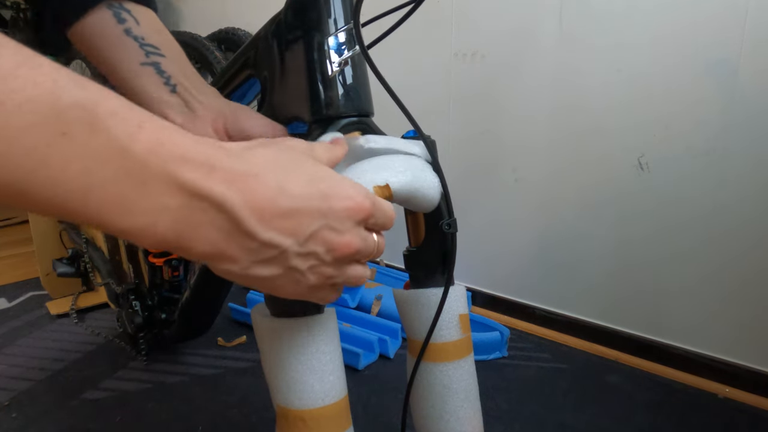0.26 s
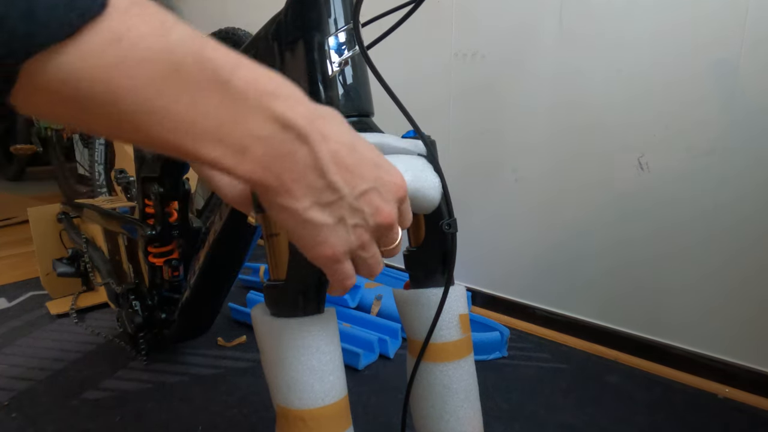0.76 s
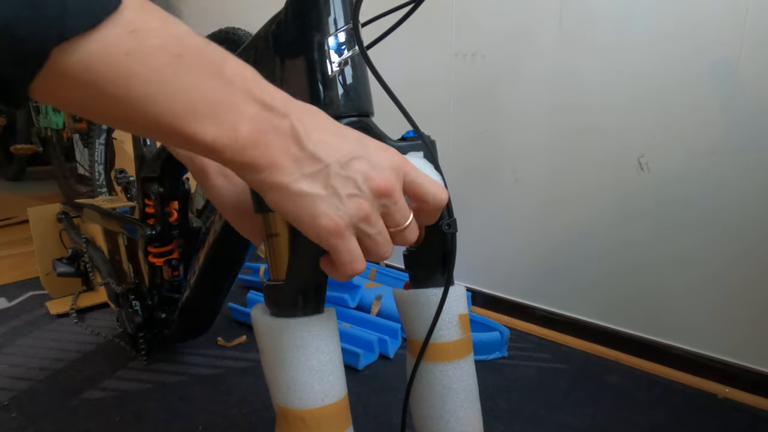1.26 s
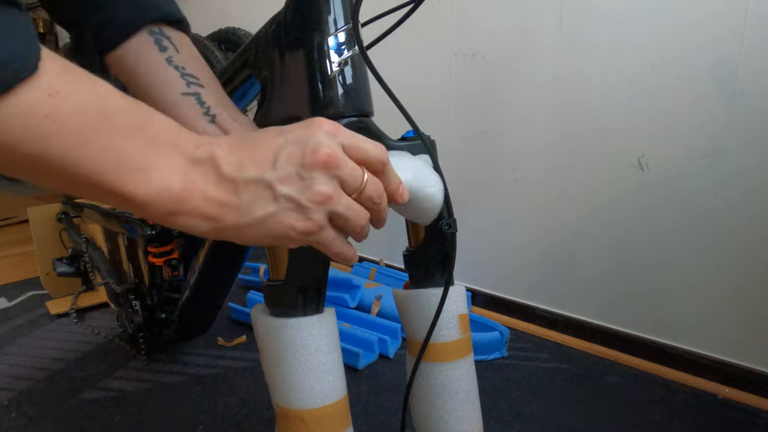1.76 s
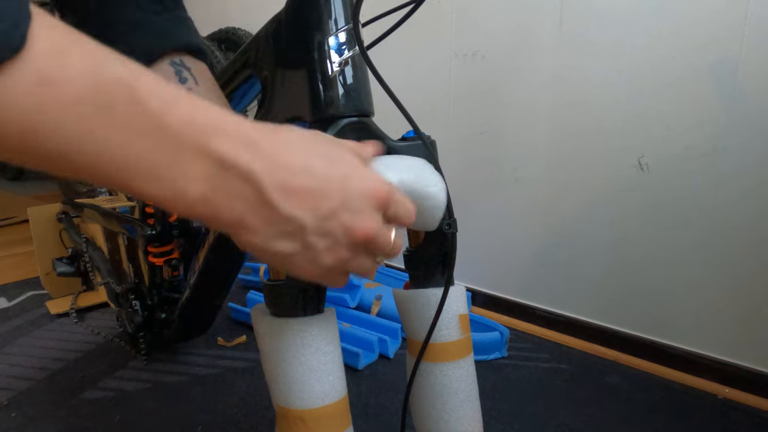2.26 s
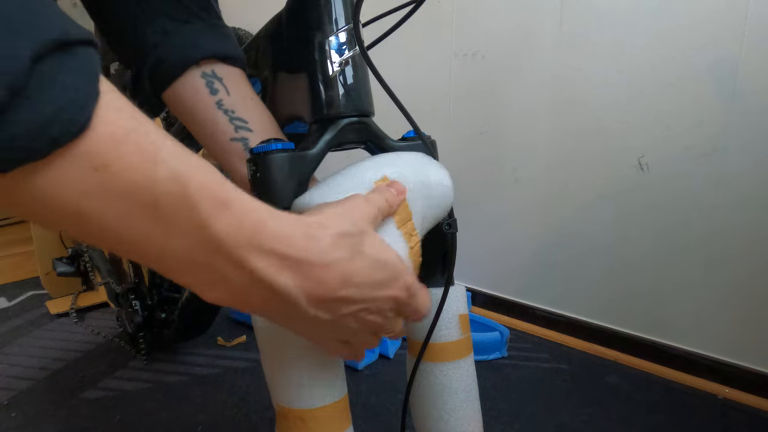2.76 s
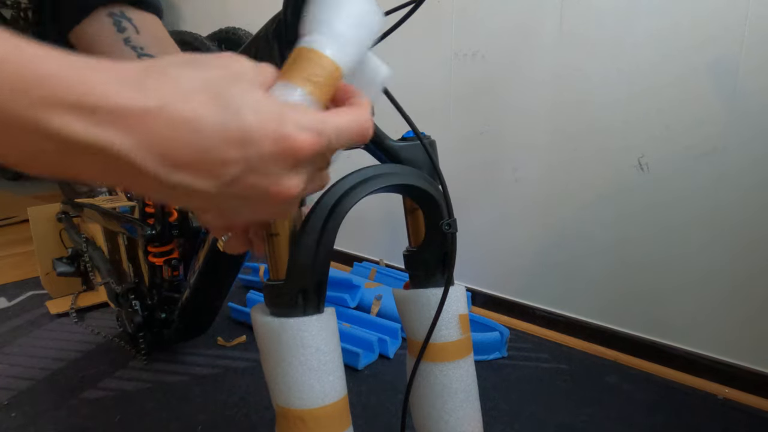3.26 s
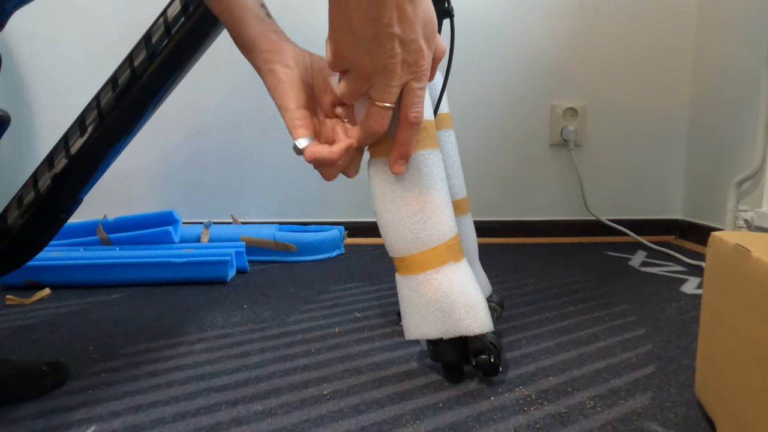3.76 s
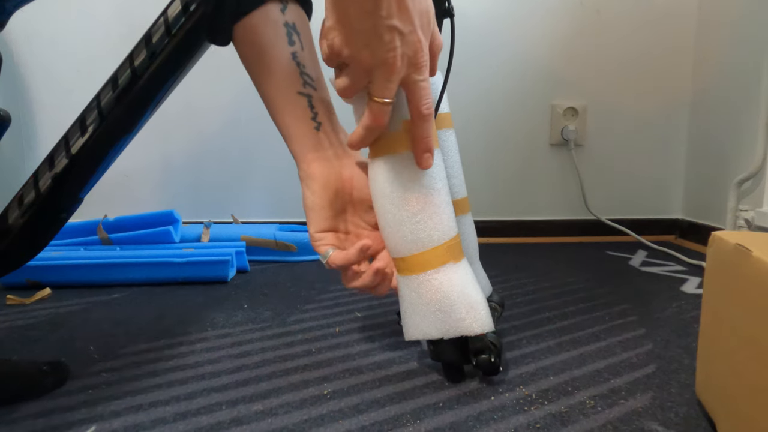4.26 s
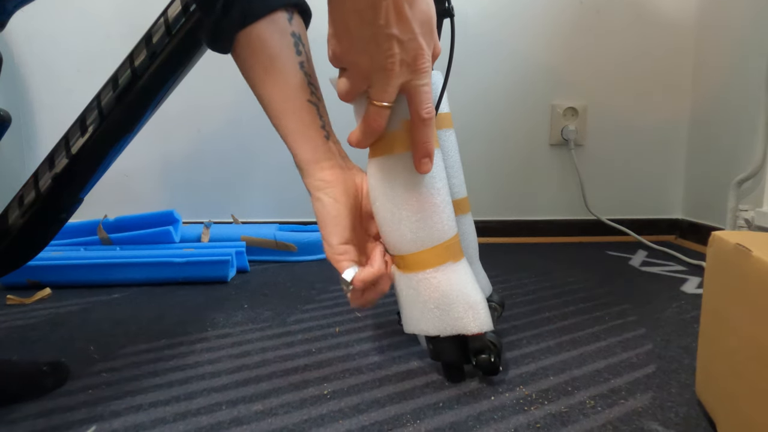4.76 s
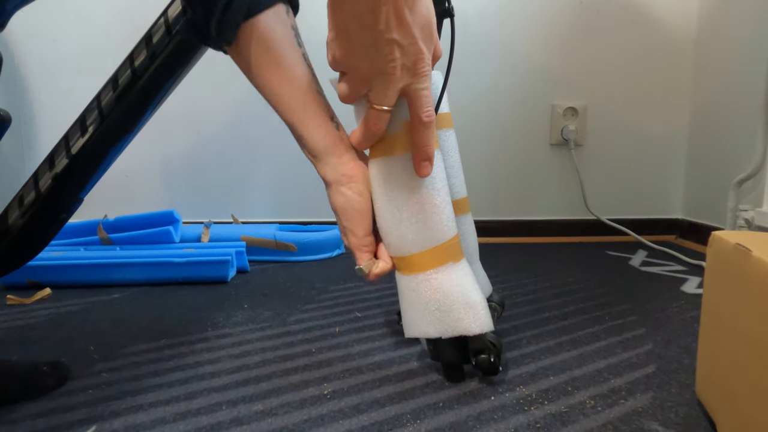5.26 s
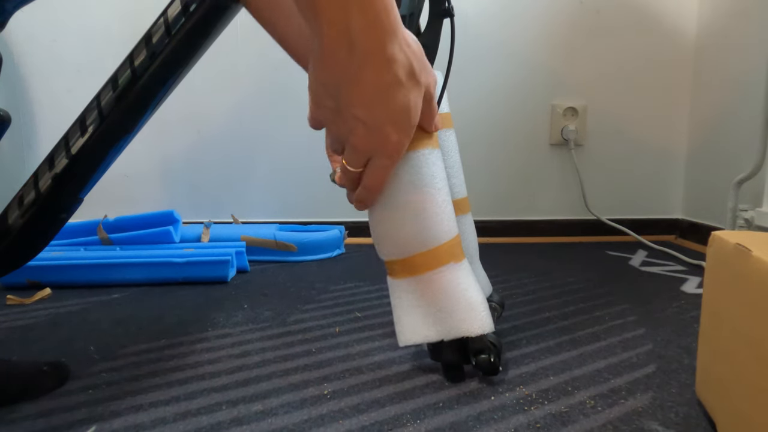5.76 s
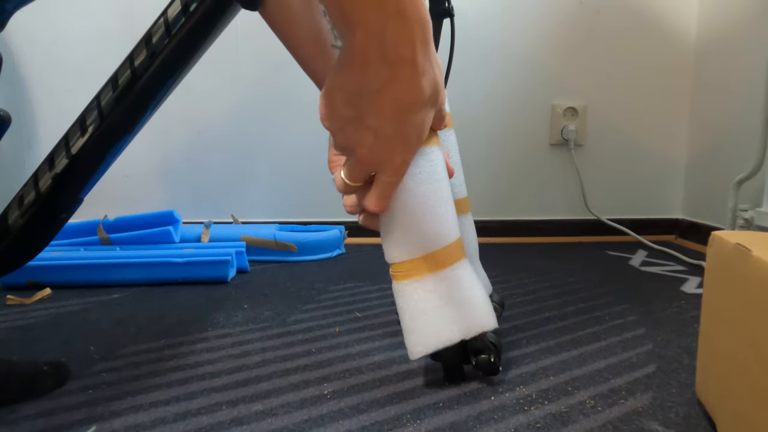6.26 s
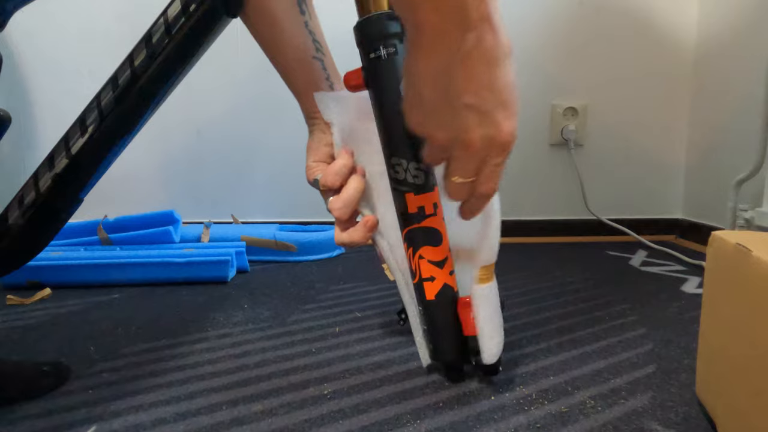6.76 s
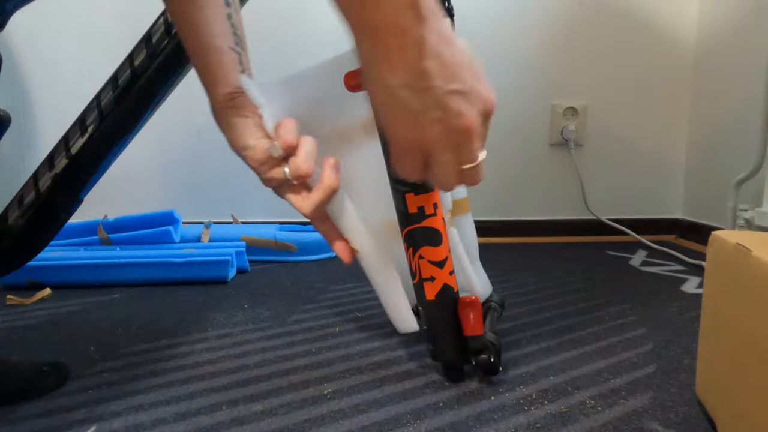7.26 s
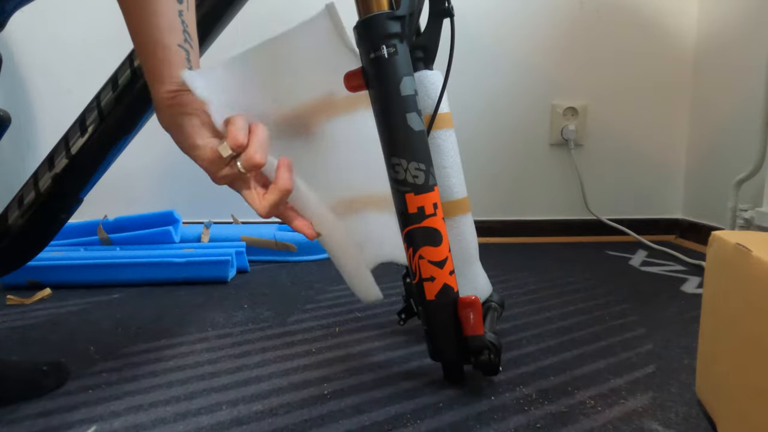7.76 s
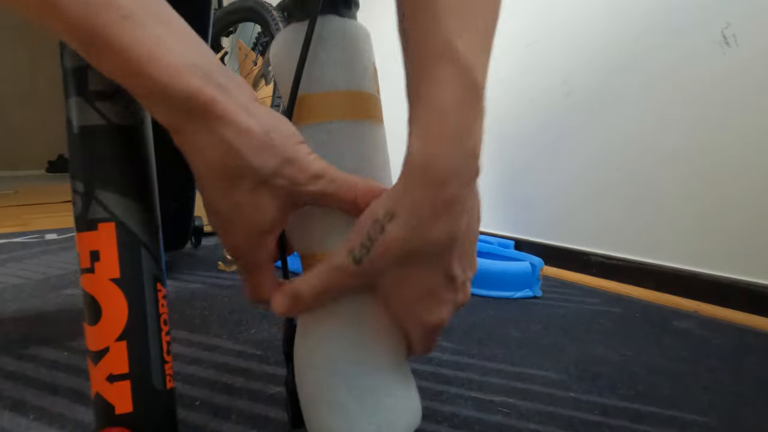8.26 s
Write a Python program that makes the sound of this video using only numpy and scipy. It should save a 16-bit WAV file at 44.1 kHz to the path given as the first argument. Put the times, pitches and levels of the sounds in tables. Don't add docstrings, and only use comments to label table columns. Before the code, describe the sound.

Hands strip foam sleeves off a bike fork: grainy rubs, creaks, sharp tape cracks, a rapid tearing crackle, then hard closing pops.

```python
import sys
import numpy as np
from scipy import signal
from scipy.fft import rfft, irfft
from scipy.io import wavfile

SR = 44100
rng = np.random.default_rng(int(sys.argv[2]) if len(sys.argv) > 2 else 0)


def decibels_to_gain(level_db):
    exponent = np.asarray(level_db, float) / 20
    return 10 ** exponent


def to_wav(s):
    ch = np.atleast_2d(s).T
    pcm = np.round(np.clip(ch, -1, 1) * 32767)
    wavfile.write(sys.argv[1], SR, pcm.astype(np.int16))


N = 374850

# (frequency [Hz], width [Hz], level [dB])
FOAM_WALL = [(1040, 166, -5), (1530, 330, -4.5), (1853, 310, -5.5), (2464, 110, -11.5)]
# (time [s], peak [dB], ring [Hz], crack [dB], thud [dB])
TAPE_BREAKS = [
    (3.7546, -5, 1920, -9, -31.5),
    (5.2234, -4, 1640, -10.5, -19.5),
    (6.487, -6, 1640, -22, -18),
]
# (time [s], peak [dB], ring [Hz], crack [dB], crack [Hz])
SEAM_RIPS = [(5.895, -29.5, 990, -54, 4200), (5.912, -29, 1040, -54, 7820), (5.932, -22.5, 990, -38, 4270),
             (5.95, -23, 980, -37, 4200), (5.955, -30, 1810, -37, 4590), (5.964, -22, 1670, -38, 4660),
             (5.977, -19.5, 1040, -31, 4200), (5.991, -26, 1520, -31.5, 4670),
             (6.009, -16, 1510, -21.5, 5700), (6.022, -23, 1460, -30, 4740), (6.04, -21.5, 1020, -21, 5850),
             (6.061, -21, 1070, -27.5, 5100), (6.085, -24, 1010, -29, 5800), (6.108, -20, 1500, -19, 5700),
             (6.125, -20.5, 1040, -32, 5140), (6.139, -24, 1460, -22, 4760), (6.158, -18.5, 990, -25, 4620),
             (6.187, -18.5, 1550, -20, 6500), (6.22, -15.5, 960, -25.5, 4600),
             (6.226, -17.5, 1880, -25.5, 6700), (6.271, -22, 1420, -20, 6660),
             (6.296, -14, 1020, -24, 5070), (6.301, -18.5, 1430, -21.5, 6660),
             (6.338, -18.5, 1400, -20, 6940), (6.367, -18.5, 1080, -21.5, 5040),
             (6.371, -14.5, 1410, -26.5, 6500), (6.428, -18.5, 1040, -27.5, 5080),
             (6.435, -20, 1350, -24, 4680)]


def rms_one(x):
    return x / np.sqrt(np.mean(x ** 2) + 1e-20)


def in_time(rows):
    s, *columns = np.transpose(rows)
    return [np.interp(np.arange(N) / SR, s, c) for c in columns]


def at_hz(points, size):
    hz = np.maximum(np.fft.rfftfreq(size, 1 / SR), 1)
    return np.interp(np.log(hz), np.log(np.array(points)[:, 0]), np.array(points)[:, 1])


def colour(x, points):
    return irfft(rfft(x) * decibels_to_gain(at_hz(points, len(x))), len(x))


def drift(rate_hz):
    r = np.exp(-40 * np.pi * rate_hz / SR)
    noise = rng.standard_normal(N // 20 + 4002)
    slow = signal.lfilter([1], [1, -2 * r, r * r], noise)[4000:]
    return np.interp(np.arange(N) / 20, np.arange(len(slow)), 2 * np.tanh(rms_one(slow) / 2))


def resonate(x, hz, width_hz):
    r = np.exp(-np.pi * abs(width_hz) / SR)
    zeros = np.array([1, 0, -1]) * (1 - r * r) / 2
    return signal.lfilter(zeros, [1, -2 * r * np.cos(2 * np.pi * hz / SR), r * r], x + 1e-18)


def body(x, modes, spread_db):
    return sum((-1) ** k * decibels_to_gain(db + spread_db[k]) * resonate(x, hz, width_hz)
               for k, (hz, width_hz, db) in enumerate(modes))


def grains(per_s, size_db, clump_db, clump_hz):
    sizes = decibels_to_gain(size_db * np.minimum(rng.exponential(1, N), 5)) * rng.choice([-1, 1], N)
    return sizes * (rng.random(N) < per_s / SR) * decibels_to_gain(clump_db * drift(clump_hz))


def add(out, s, peak_db, shape):
    i = round(s * SR)
    out[i:i + len(shape)] += (decibels_to_gain(peak_db) * shape / np.abs(shape).max())[:N - i]


def background():
    # (frequency [Hz], level [dB per Hz])
    air_spectrum = [(12, -44), (20, -27), (48, -23.5), (100, -10), (135, 14.5), (168, 14.5), (825, -2.5),
                    (1150, 9), (2460, -8), (4180, -19.5), (5230, -72.5), (7110, 4), (12100, -22),
                    (16000, -15)]
    # (time [s], frequency [Hz], level [dB])
    hum_course = [
        (0.0, 63.9, -84.5),
        (1.76, 65.4, -64.5),
        (2.42, 65.5, -62.5),
    ]
    # (multiple [1], level [dB])
    hum_overtones = [(3.25, -13.5), (5.999, -14)]
    # (time [s], level [dB])
    rumble_course = [(0.0, -81), (2.01, -69), (2.39, -74), (2.79, -73), (3.67, -73.5), (3.84, -63),
                     (4.33, -82), (4.97, -81), (5.3, -70), (5.78, -85), (5.99, -82), (6.46, -70.5),
                     (6.63, -77), (7.62, -84), (8.29, -71), (8.5, -80)]
    duck_db, duck_s = -5.5, 0.87

    air = decibels_to_gain(-59 - 9.5) * rms_one(colour(rng.standard_normal(N), air_spectrum))
    since_s = np.arange(N) / SR - np.array(TAPE_BREAKS)[:, :1]
    ducks = np.where(since_s > 0, duck_db * np.exp(-np.abs(since_s) / duck_s), 0)
    air = decibels_to_gain(np.sum(ducks, axis=0)) * air

    low = signal.butter(3, [20, 52], "band", fs=SR, output="sos")
    rumble = rms_one(signal.sosfilt(low, rng.standard_normal(N)))
    rumble = decibels_to_gain(in_time(rumble_course)[0] + 3.5 + 2.6 * drift(3.6)) * rumble

    hz, hum_db = in_time([*hum_course, (2.6, 62, -100)])
    turns = np.cumsum(hz) / SR
    tones = sum(decibels_to_gain(db) * np.sin(2 * np.pi * k * turns) for k, db in [(1, 0.0061), *hum_overtones])
    hum = np.sqrt(2) * decibels_to_gain(hum_db + 1.2 * drift(4.4)) * tones
    return air + rumble + hum


def strokes():
    # (centre [s], half length [s], wall pressure [dB], skin
    # share [dB], hollow grip [dB])
    even_swells = [(0.3, 0.18, -63.5, 5, -15), (0.693, 0.19, -48, -7, -8),
                   (1.001, 0.15, -33.5, -10.5, -7.5), (1.173, 0.12, -55, -2.5, -10),
                   (1.493, 0.23, -51.5, -7.5, -11.5), (1.75, 0.29, -62.5, -2.5, -11),
                   (2.064, 0.064, -58, 1.5, -9.5), (2.77, 0.6, -55.5, 4.5, -6.5),
                   (2.998, 0.11, -47, 4, 0.5), (3.242, 0.068, -44.5, 0, -5),
                   (3.352, 0.041, -46.5, -4.5, -5),
                   (3.7, 0.2, -70.5, 16.5, -7), (4.214, 0.14, -56.5, 13.5, -9.5),
                  (4.5, 0.27, -67.5, 15.5, 1.5), (4.98, 0.29, -74, 17.5, 2), (5.17, 0.07, -71, 17, -8),
                  (5.639, 0.11, -51, 4, -14), (5.78, 0.034, -67, 4, -12), (5.89, 0.077, -52, -1, -3),
                  (5.99, .12, -43.5, -0.5, -7), (6.2, 0.4, -45, 3, 1), (6.381, 0.17, -39.5, 1, -2),
                  (7.04, 0.41, -63, 5.5, 2), (7.762, 0.18, -64.5, 0, -7), (8.2, 0.093, -45.5, 5, -6),
                  (8.45, 0.47, -42.5, 0, -9.5)]
    # (start [s], length [s], pressure [dB], skin share [dB], grip [dB])
    jerks = [(0.01, 0.3, -66, 9, -26), (0.605, 0.07, -38, -10, -9.5), (1.635, 0.05, -41.5, -7.5, -27),
             (2.144, 0.9, -40, -6, -18.5), (2.842, 0.14, -35, -6.5, -7), (3.137, 0.19, -40, -2.5, -5.5),
             (3.512, 0.35, -51.5, -3, -10.5), (3.747, 0.37, -46.5, -5, -4.5), (4.055, 0.33, -59, 1.5, -4.5),
             (4.768, 0.087, -54.5, -2, -4), (5.221, 0.47, -36.5, -22, -7), (5.403, 0.5, -48.5, 3, -8),
             (6.5, 0.29, -42.5, -17, 2.5), (6.753, 0.19, -54.5, 1.5, -6), (7.321, 0.21, -48.5, 0, 1.5),
             (7.922, .12, -62.5, 8.5, 1), (8.016, 0.13, -51, 3.5, 5.5), (8.115, 0.099, -46, 0, -0.5)]
    # (end [s], length [s], pressure [dB], skin share [dB], grip [dB])
    stops = [(6, 0.15, -48, -1, -18), (5.2, 0.3, -57.5, 10.5, -15), (7.635, 0.54, -58.5, 11.5, 0),
             (6.675, 0.79, -46.5, -8, -10)]
    layer_fades = (1.29, 0.99, 1.39)
    # (wall [dB], skin [dB], hollow [dB])
    resting_db = (-74, -84.5, -86)
    swell_edge_db, jerk_end_db = -19.5, -22.5
    jerk_attack_s, stop_s = 0.03, 0.031

    t = np.arange(0, N + 64, 64) / SR
    swells = even_swells
    fades = [swell_edge_db * ((t - s) / length_s) ** 2 for s, length_s, *_ in swells]
    fades += [jerk_end_db * np.maximum((t - s) / length_s, (s - t) / jerk_attack_s)
              for s, length_s, *_ in jerks]
    fades += [jerk_end_db * np.maximum((s - t) / length_s, (t - s) / stop_s)
              for s, length_s, *_ in stops]
    power = decibels_to_gain(2 * np.array(resting_db))[:, None]
    for fade_db, (_, _, db, skin_db, grip_db) in zip(fades, [*swells, *jerks, *stops]):
        layers_db = db + np.array([[0], [skin_db], [grip_db]])
        power = power + decibels_to_gain(2 * (layers_db + np.outer(layer_fades, fade_db)))
    return [np.interp(np.arange(N) / SR, t, np.sqrt(p)) for p in power]


def rubbing():
    # (frequency [Hz], width [Hz], level [dB])
    crown_wall = [(1106, 260, 1), (1175, 25, 12), (1500, 140, -1), (1823, 140, -2), (2140, 530, -11),
                  (3340, 510, -20), (4100, 67, -22), (5600, 490, -20)]
    crown_hollow = [(205, 48, -36), (275, 31, -11), (496, 40, 2.5), (647, 103, -3.5)]
    leg_hollow = [(147, 39, 6), (231.5, 210, 1), (388, 84, 4.5), (686, 1500, -2)]
    # (frequency [Hz], level [dB per Hz])
    hiss_spectrum = [(1180, -7.5), (2000, -3), (2490, -3), (2980, -4.5), (3520, -1), (3770, -1.5),
                     (4600, -2.5), (5250, -11), (5990, -4), (7060, -2.5), (9250, -17), (12400, -26),
                     (13800, -27.5), (16000, -54)]
    crown_off_s = 1.394

    on_wall, on_skin, on_hollow = strokes()
    loose = np.clip((np.arange(N) / SR - crown_off_s) * 10, 0, 1)
    stutter = decibels_to_gain(0.23 * drift(21))
    slips, slow_slips = grains(6000, 3.4, 2.3, 45), grains(2000, 2.0, 2.65, 21)

    walls = []
    for modes, top_hz in ((crown_wall, 6500), (FOAM_WALL, 3000)):
        band = signal.butter(2, [950, top_hz], "band", fs=SR, output="sos")
        rung = body(slips, modes, [2.9 * drift(7.6) for _ in modes])
        walls.append(rms_one(signal.sosfilt(band, rung)))
    steep = signal.butter(4, [130, 850], "band", fs=SR, output="sos")
    hollows = []
    for modes in (crown_hollow, leg_hollow):
        rung = body(slow_slips, modes, [1.5 * drift(5.7) for _ in modes])
        hollows.append(rms_one(signal.sosfilt(steep, rung)))

    fine = colour(grains(12000, 1.5, 1.68, 60), hiss_spectrum)
    hiss = -0.41 * resonate(fine, 4690, 820)
    for hz in 2400 * 1.372 ** np.arange(6):
        band = resonate(resonate(fine, hz, 0.99 * hz), hz, 0.99 * hz)
        hiss = hiss + decibels_to_gain(1.92 * drift(3.5) + 2.0 * drift(24)) * band
    hiss = rms_one(hiss)
    dull_hiss = signal.sosfilt(signal.butter(1, 7000, fs=SR, output="sos"), hiss)

    wall, hiss, hollow = [(1 - loose) * crown + loose * leg
                          for crown, leg in (walls, (dull_hiss, hiss), hollows)]
    return stutter * (on_wall * wall + on_skin * hiss + on_hollow * hollow)


def snaps(rows, burst_s, ring_q, wall_share, crack_s, thud_s, low_hz):
    # (frequency [Hz], width [Hz], level [dB])
    crack_modes = [(3300, 790, -4.5), (5070, 1010, -0.5), (5500, 2160, 1), (7180, 2750, -3.5),
                   (7870, 7100, -33), (12000, 14000, -22)]
    thud_modes = [(143.3, 98, 1), (280, 139, -0.5), (425, 247, 0), (610, 248, -3)]
    out, t = np.zeros(N), np.arange(3000) / SR
    thin = signal.butter(2, low_hz, "high", fs=SR, output="sos")
    small = signal.butter(6, 140, "high", fs=SR, output="sos")
    matt = signal.butter(3, 9000, fs=SR, output="sos")
    rattle = 0.36 * np.exp(-t / 0.0049)
    for s, peak_db, hz, crack_db, thud_db, *crack_hz in rows:
        noise, spread_db = rng.standard_normal((3, len(t))), rng.normal(0, 2.8, 12)
        burst = noise[0] * (np.exp(-(t / burst_s) ** 2) + rattle)
        ring = resonate(burst, hz, hz / ring_q) - 0.13 * resonate(burst, 1900, 2700)
        ring = ring + wall_share * body(burst, FOAM_WALL, spread_db[:len(FOAM_WALL)])
        add(out, s, peak_db, signal.sosfilt(thin, ring))

        crack = noise[1] * (np.exp(-t / crack_s) + rattle)
        crack = body(crack, crack_modes, spread_db[-len(crack_modes):])
        for top_hz in crack_hz:
            crack = crack + 1.9 * resonate(crack, top_hz, 0.14 * top_hz)
        add(out, s, crack_db - 0.5, signal.sosfilt(matt, crack))

        thud = body(noise[2] * np.exp(-t / thud_s), thud_modes, spread_db[4:8])
        add(out, s, thud_db, signal.sosfilt(small, thud))
    return out


def creaks():
    # (time [s], peak [dB], ring [Hz], crack [dB], thud [dB])
    creak_events = [(0.043, -41, 1200, -43.5, -68), (0.608, -31.5, 1140, -31, -52),
                    (0.625, -30, 1380, -36, -47), (0.696, -36.5, 1420, -39.5, -44),
                    (1.397, -37.5, 1550, -46, -55), (1.633, -32, 1340, -31, -72),
                    (1.905, -46, 1350, -57, -55), (2.123, -34, 1530, -58, -73),
                    (2.162, -35, 1250, -52, -70), (2.213, -30, 1450, -57, -64),
                    (2.304, -29, 2130, -28.5, -42.5), (2.421, -32.5, 2580, -35, -52),
                    (2.549, -57, 1470, -33, -54), (2.829, -26.5, 1190, -36, -31.5),
                    (2.993, -31, 1040, -53, -36), (3.125, -29, 1140, -54, -26.5),
                    (3.21, -34, 1690, -35, -63), (3.255, -26.5, 1060, -54, -28.5),
                    (3.348, -34.5, 1970, -27, -33.5), (3.509, -47, 1470, -33, -87),
                    (3.526, -28.5, 1550, -27.5, -51)]
    return snaps(creak_events, burst_s=0.0083, ring_q=4.9, wall_share=0.03,
                 crack_s=0.00067, thud_s=0.0054, low_hz=680)


def scuffs():
    # (start [s], end [s], note [Hz], level [dB])
    palm_drags = [(4.1, 4.19, 850, -51), (4.54, 4.66, 870, -56), (5.2, 4.7, 200, -55),
                  (0.646, 0.776, 270, -52.5), (0.65, 0.77, 515, -49), (6.912, 7.106, 970, -52),
                  (7.27, 7.37, 310, -46), (7.9, 8.12, 610, -52), (7.9, 7.95, 390, -50),
                  (7.98, 8.05, 414, -49), (6.88, 7.12, 247, -51.5), (6.73, 6.82, 192, -55),
                  (6.5, 6.69, 1760, -40.5), (5.24, 5.4, 1150, -38), (5.26, 5.44, 1800, -38),
                  (5.23, 5.33, 2500, -41), (5.48, 5.54, 2200, -44), (5.6, 5.68, 1350, -44),
                  (5.57, 5.71, 2400, -45), (.9, 1.08, 1160, -38), (5.88, 6.28, 177, -39.5),
                  (6.27, 6.46, 265, -36), (7.38, 7.43, 185, -53), (2.12, 2.26, 200, -55),
                  (2.13, 2.25, 620, -52), (7.57, 7.62, 950, -52), (3.79, 3.9, 1700, -48)]
    out, t, slips = 0, np.arange(N) / SR, grains(2500, 2.3, 2.0, 30)
    for start_s, end_s, hz, db in palm_drags:
        length_s = max(end_s - start_s, .02)
        stroke = np.sin(np.pi * np.clip((t - start_s) / length_s, 0, 1))
        note = stroke * resonate(resonate(slips, hz, 0.2 * hz), hz, 0.46 * hz)
        out = out + decibels_to_gain(db - 8.5) * np.sqrt(length_s * SR / N) * rms_one(note)
    return out


def picks():
    # (time [s], peak [dB], ring [Hz], crack [dB])
    nail_picks = [(1.32, -58, 1100, -66), (1.348, -54, 1210, -66), (1.517, -36, 1170, -57),
                  (1.552, -35, 1500, -54), (2.134, -35, 1600, -55), (3.72, -41, 1685, -37),
                  (4.006, -39, 2080, -35.5), (4.048, -41, 2700, -60), (4.115, -39, 1570, -51),
                  (4.221, -28.5, 3480, -45), (4.39, -43, 2760, -33), (4.575, -48, 1860, -35),
                  (4.615, -54, 3800, -35), (4.757, -50, 3490, -39), (4.769, -32.5, 3300, -30),
                  (4.946, -42.5, 3360, -36), (5.074, -54, 3500, -35), (5.174, -46, 3310, -36),
                  (5.391, -32, 1760, -44), (5.396, -34, 1800, -30), (5.411, -33, 1890, -30),
                  (5.43, -36, 1860, -28), (5.608, -28.5, 3300, -50), (5.629, -38.5, 1520, -51),
                  (5.848, -32.5, 1900, -29.5), (7.341, -38, 1334, -33), (7.593, -51.5, 3830, -34),
                  (7.878, -57.5, 2390, -44), (8.016, -36, 2040, -29.5), (8.111, -41, 1770, -28.5),
                  (8.24, -29, 1860, -25), (5.527, -37.5, 2270, -31.5), (5.786, -47, 1800, -45)]
    rows = [(*row, row[-1] - 21.5) for row in nail_picks]
    return snaps(rows, burst_s=0.00076, ring_q=11.0, wall_share=0.052,
                 crack_s=0.00071, thud_s=0.00085, low_hz=1020)


def knocks():
    # (time [s], peak [dB], tone [Hz])
    fingertips = [(1.323, -52, 600), (1.347, -50, 600), (1.515, -45, 644), (1.549, -47, 600),
                  (2.366, -43, 650), (2.488, -46, 850), (2.55, -50, 230), (2.745, -51, 434),
                  (3.012, -36, 1000), (3.222, -40, 700), (3.571, -42, 1480), (3.586, -39, 1470),
                  (4.388, -51.5, 386), (4.494, -53, 665), (4.514, -49, 659), (4.589, -49, 969),
                  (4.622, -40, 685), (4.768, -47, 910), (4.88, -49, 1800), (4.904, -52, 1900),
                  (5.397, -37.5, 500), (5.409, -32.5, 450), (5.421, -39, 474), (5.431, -37, 600),
                  (7.339, -39, 610), (7.599, -50, 200), (8.024, -36, 403)]
    decay_cycles, upper, upper_db = 1.62, 1.54, -4.5
    out, t = np.zeros(N), np.arange(2000) / SR
    for s, peak_db, hz in fingertips:
        tones = np.sin(2 * np.pi * hz * t) + decibels_to_gain(upper_db) * np.sin(2 * np.pi * upper * hz * t)
        add(out, s, peak_db, tones * t * np.exp(-t * hz / decay_cycles * 2))
    return out


def slaps(rows, tones, length_s):
    out, t = np.zeros(N), np.arange(400) / SR
    swing = np.sin(np.pi * np.minimum(t / length_s, 1) ** .6) ** 2
    for s, peak_db, hz, *_ in rows:
        flap = sum(decibels_to_gain(db) * np.sin(2 * np.pi * (k * hz * t + rng.random())) for k, db in tones)
        add(out, s, peak_db, swing * flap)
    return out


def pops():
    # (time [s], peak [dB], ring [Hz], crack [dB])
    thumb_pops = [
        (2.123, -24, 1500, -51),
        (2.8257, -26, 1280, -23),
        (3.1232, -26, 1180, -47),
        (8.175, -15.5, 1490, -27),
        (8.3223, -7, 1537, -15.5),
        (8.4115, -7, 1560, -21),
        (8.4434, -6, 1520, -21),
    ]
    # (multiple [1], level [dB])
    pop_tones = [(1.0001, 0.5), (1.35, -5.5), (1.95, -10)]
    after = [(s, db - 5.0, hz, crack_db, db - 24.0, 7000) for s, db, hz, crack_db in thumb_pops]
    ragged = snaps(after, burst_s=0.0034, ring_q=8.3, wall_share=0.31,
                   crack_s=0.0017, thud_s=0.0013, low_hz=750)
    return slaps(thumb_pops, pop_tones, 0.0031) + ragged


def tugs():
    # (time [s], peak [dB], share of the full ring left by the holding hand [1])
    tug_events = [(2.824, -40.5, 0.34), (2.987, -54, 0.33), (3.123, -47, .3), (3.255, -28.5, 0.36),
                  (3.346, -55, 0.35), (3.757, -21.5, 0.94), (5.224, -20.5, 1.12), (6.303, -50, .3),
                  (6.367, -49, .3), (6.487, -23, 0.43), (7.343, -54, .4), (7.598, -56, 0.34),
                  (7.752, -52, 0.46), (8.018, -53.5, 0.5), (8.298, -42, 0.44), (8.367, -51, .4)]
    # (frequency [Hz], level [dB], t60 [s])
    fork_modes = [(37.8, -1, 0.37), (64.4, 4, 0.14), (77, -3.5, 0.2), (113, -11, 0.2), (150, -5.5, 0.18),
                  (173, -2, 0.14), (216, -2, 0.14)]
    out, t = np.zeros(N), np.arange(SR // 2) / SR
    for s, peak_db, share in tug_events:
        boom = 0
        for hz, db, t60_s in fork_modes:
            beat = 0.46 * np.sin(2 * np.pi * (rng.uniform(2.0, 22) * t + rng.random()))
            fall_db = db + rng.normal(0, 4.2) - 60 * t / (abs(share * t60_s) + .01)
            onset = 1 - np.exp(-t * hz / 0.41)
            boom = boom + (1 + beat) * decibels_to_gain(fall_db) * onset * np.sin(2 * np.pi * hz * t)
        add(out, s, peak_db, boom * (1 - np.exp(-t / 0.0013)))
    return out


def recoils():
    # (time [s], peak [dB], first pitch [Hz], last pitch [Hz], length [s])
    whips = [
        (2.8282, -10, 1600, 1250, .0012),
        (2.8302, -19, 1200, 1150, .003),
        (3.1232, -15, 1500, 1300, .0009),
        (3.1251, -15, 1300, 1100, .0009),
        (3.1267, -20, 1700, 1500, .0012),
        (3.7544, 2, 1400, 2900, .0013),
        (5.2234, 2, 2700, 1150, .0018),
        (6.4865, 0, 1900, 1550, .0017),
    ]
    # (multiple [1], level [dB])
    whip_tones = [(1.001, 0), (1.65, -6), (3.2, -15)]
    sag_s, attack_s = .0012, .0004
    out, t = np.zeros(N), np.arange(600) / SR
    for s, peak_db, first_hz, last_hz, length_s in whips:
        turns = np.cumsum(last_hz + (first_hz - last_hz) * np.exp(-t / sag_s)) / SR
        whip = sum(decibels_to_gain(db) * np.sin(2 * np.pi * k * turns) for k, db in whip_tones)
        attack = 1 - np.exp(-(t / attack_s) ** 2)
        add(out, s, peak_db, whip * attack * np.exp(-(t / length_s) ** 2))
    return out


def breaks():
    # (time from break [s], level [dB])
    lead_in = [
        (-.0107, -21),
        (-.0212, -35),
    ]
    # (multiple [1], level [dB])
    slap_tones = [(1.0001, 3.5), (1.5, 1), (2.05, -1.5), (4.099, -12)]
    rows = [(s, db - 7, hz, crack_db, thud_db) for s, db, hz, crack_db, thud_db in TAPE_BREAKS]
    for s, db, hz, crack_db, thud_db in TAPE_BREAKS:
        for lead_s, lead_db in lead_in:
            rows.append((s + lead_s, db + lead_db + 10.5, hz,
                         crack_db + lead_db - 4.5, thud_db + lead_db + 0.5))
    ragged = snaps(rows, burst_s=0.0011, ring_q=1.5, wall_share=0.34,
                   crack_s=0.001, thud_s=0.0032, low_hz=1000)
    dull = signal.butter(4, 8000, fs=SR, output="sos")
    return signal.sosfilt(dull, ragged) + decibels_to_gain(-9) * slaps(TAPE_BREAKS, slap_tones, 0.0017)


def rips():
    crack_db, thud_db = 8.5, -10
    rows = [(s, db, hz, mean_db + crack_db, db + thud_db, crack_hz)
            for s, db, hz, mean_db, crack_hz in SEAM_RIPS]
    return snaps(rows, burst_s=0.00055, ring_q=2.1, wall_share=0.1,
                 crack_s=0.0011, thud_s=0.001, low_hz=430)


def between_rips():
    sag_db_per_s, floor_db = -330, -10
    t, rip_s = np.arange(N) / SR, np.array(SEAM_RIPS)[:, 0]
    since_s = t - rip_s[np.maximum(np.searchsorted(rip_s, t) - 1, 0)]
    ripping = (since_s > 0) & (t < TAPE_BREAKS[-1][0])
    return decibels_to_gain(np.where(ripping, np.maximum(sag_db_per_s * since_s, floor_db), 0))


def room(x):
    # (frequency [Hz], level [dB])
    tail_spectrum = [(100, -37.5), (400, -16.5), (800, -10.5), (1300, 1), (2200, 0), (4000, -6),
                     (5300, -9.5), (7000, -20), (12000, -65)]
    t60_s, room_db, recover_s, split_hz = 0.74, -48, .045, 2300
    t, out = np.arange(SR // 2) / SR, 0
    low = signal.butter(2, split_hz, fs=SR, output="sos")
    high = signal.butter(2, split_hz, "high", fs=SR, output="sos")
    tails = [rms_one(colour(rng.standard_normal(N), tail_spectrum)) for _ in range(3)]
    dull_source = signal.sosfilt(low, x)
    dull_tail = signal.sosfilt(low, tails[0])
    bright_tail = signal.sosfilt(high, tails[1] - signal.sosfilt(low, tails[2]))
    for tail, source, band_t60_s, db in ((dull_tail, dull_source, t60_s, 0.1),
                                         (bright_tail, x - dull_source, 0.98 * t60_s, -1.5)):
        decay = decibels_to_gain(-120 * t / band_t60_s) * (1 - np.exp(-t / recover_s)) ** 2
        power = np.abs(signal.fftconvolve(source ** 2, decay)[:N])
        out = out + decibels_to_gain(db) * tail * np.sqrt(power)
    return decibels_to_gain(room_db) * out


def ports(x):
    # (frequency [Hz], level [dB])
    port_level = [(40, -0.5), (300, -3), (1500, -1.5), (3500, -2), (6000, -0.7), (14000, 2)]
    # (frequency [Hz], phase [rad])
    port_phase = [(300, 0), (1000, .15), (3000, .3), (6000, 0)]
    # (frequency [Hz], level [dB])
    unshared = [(50, -21.5), (500, -11), (1200, -11.5), (3000, -9.5), (8000, -14.5), (14000, 0)]
    step = decibels_to_gain(at_hz(port_level, N) / 2) * np.exp(.5j * at_hz(port_phase, N))
    smear = rng.standard_normal((2, 900)) * np.exp(-np.arange(900) / (0.0045 * SR))
    turn_rad = 3.25 * drift(5.9)
    a, b = [signal.fftconvolve(x, s / np.sqrt(np.sum(s ** 2)))[:N] for s in smear]
    side = colour(a * np.cos(turn_rad) + b * np.sin(turn_rad), unshared)
    return np.array([irfft(rfft(x) * step, N) + side, irfft(rfft(x) / step, N) - side])


def scene():
    hits = creaks() + picks() + pops() + rips()
    loud = breaks() + recoils()
    tail = room(loud + decibels_to_gain(-3) * hits)
    hands = between_rips() * rubbing() + knocks() + scuffs()
    return ports(hits + loud + tail + hands + tugs() + background())


def low_pass(x):
    return signal.sosfilt(signal.butter(12, 16480, fs=SR, output="sos"), x)


def record(dry):
    roll_off = signal.butter(8, 14600, fs=SR, output="sos")
    mix = signal.sosfilt(roll_off, np.clip(dry, -.87, .87))
    return low_pass(mix)


dry = scene()
out = record(dry)
to_wav(out)
```